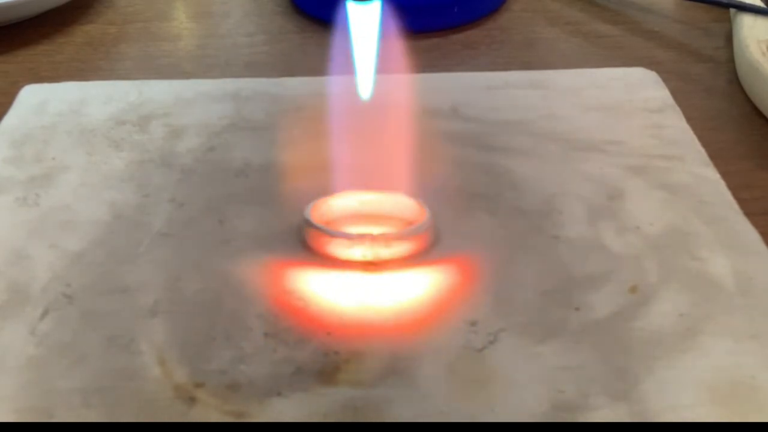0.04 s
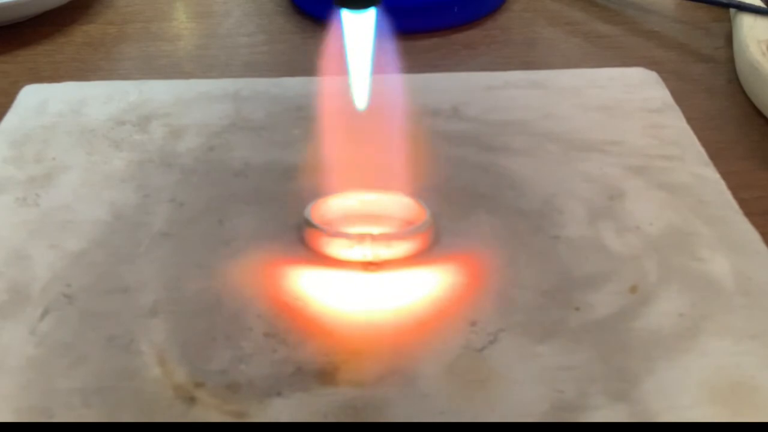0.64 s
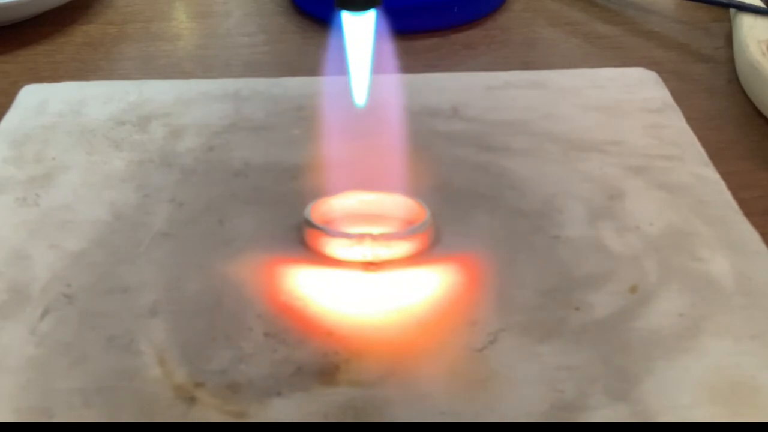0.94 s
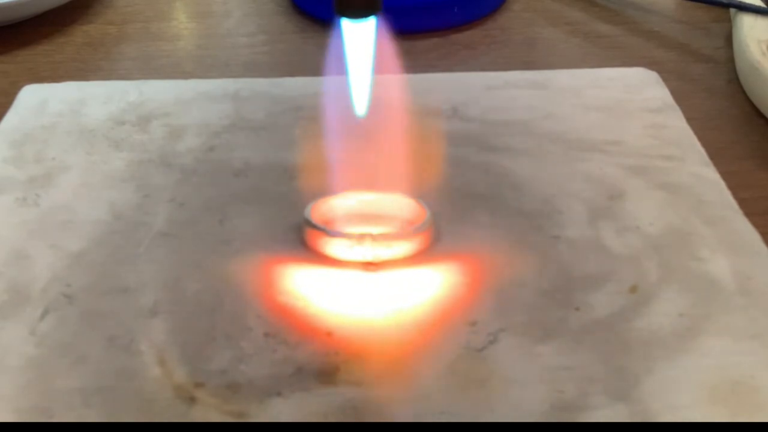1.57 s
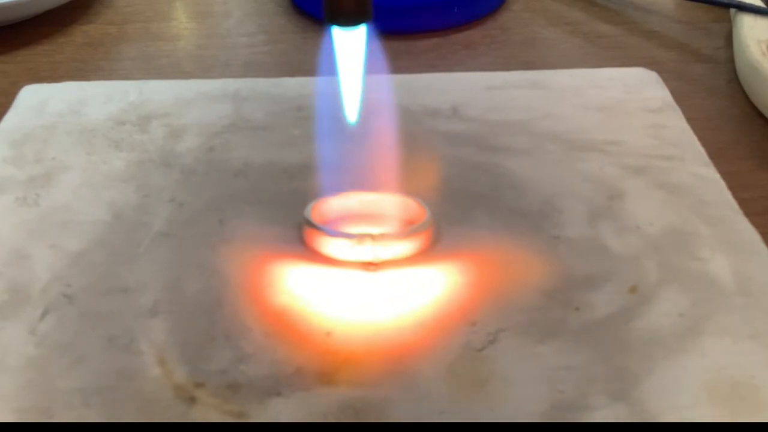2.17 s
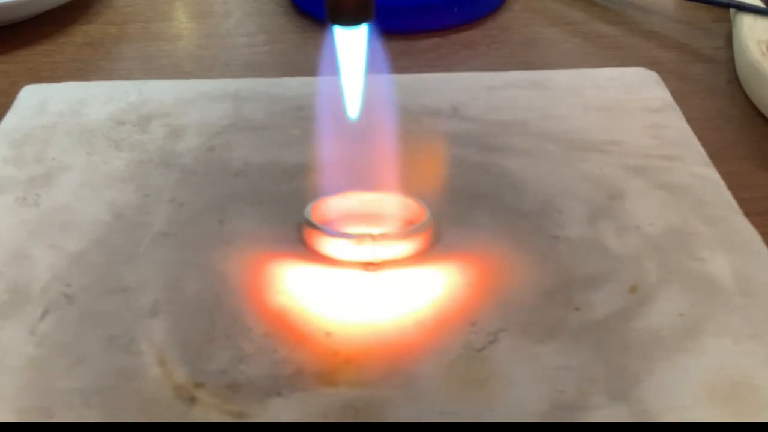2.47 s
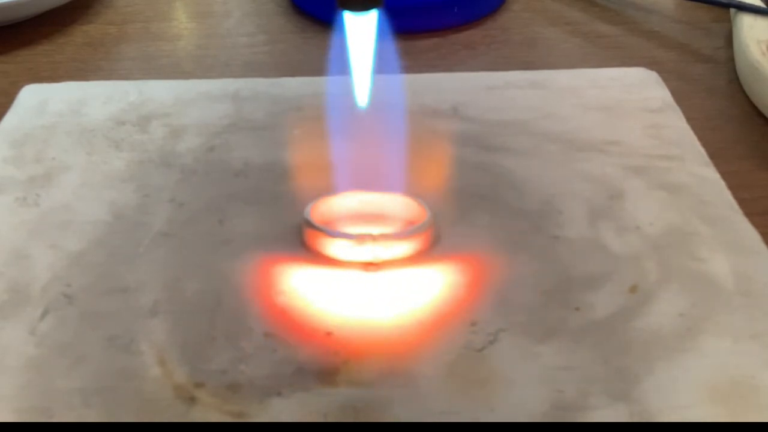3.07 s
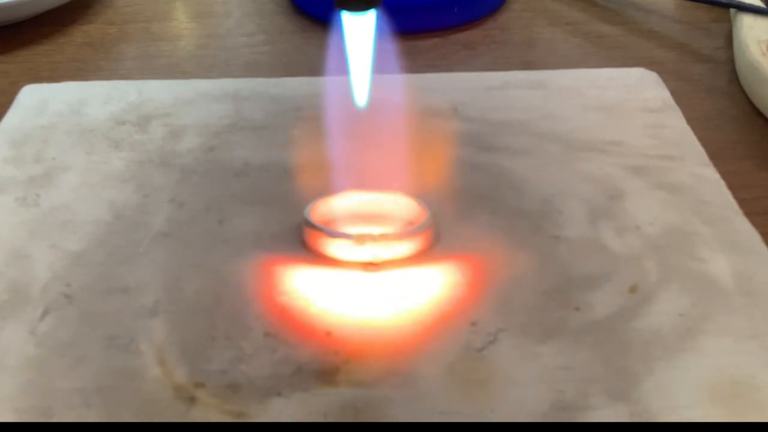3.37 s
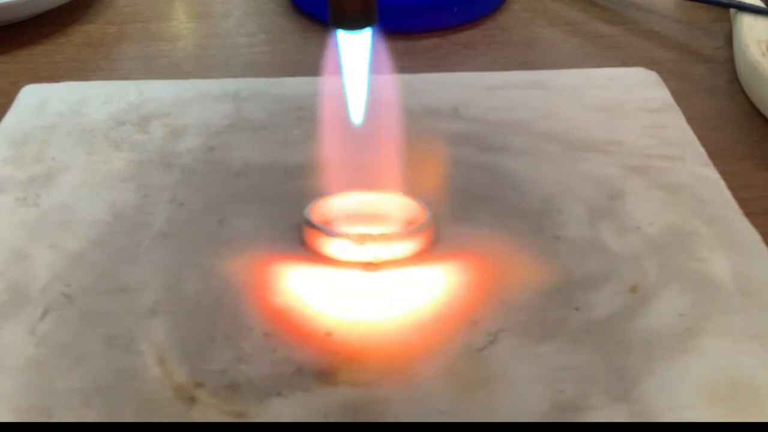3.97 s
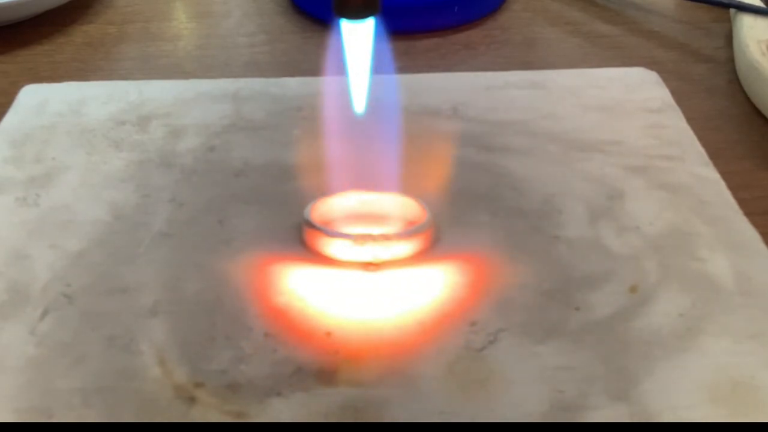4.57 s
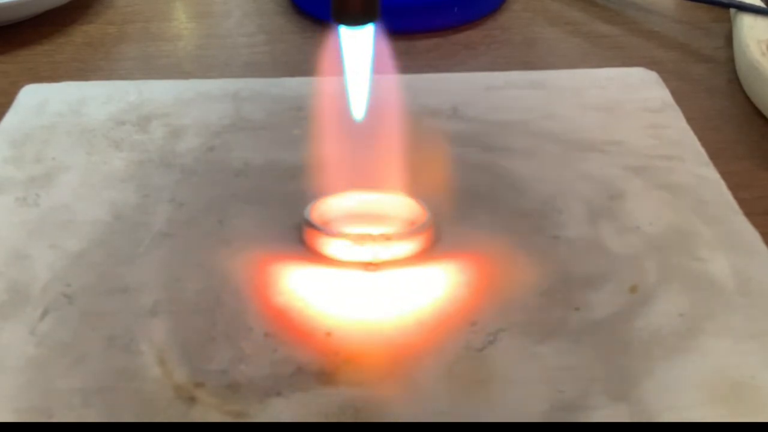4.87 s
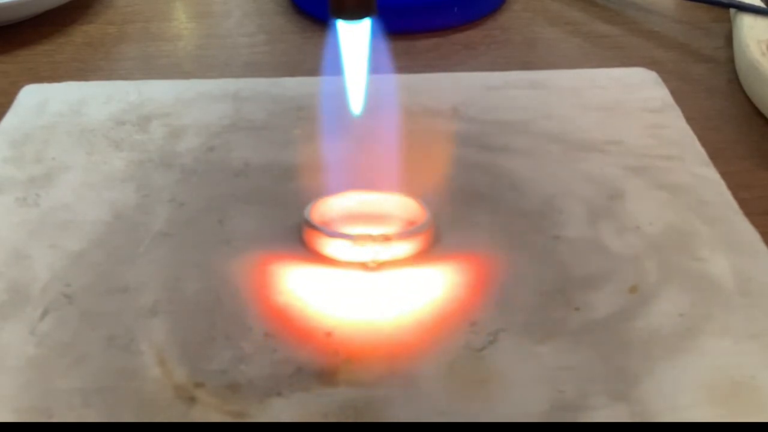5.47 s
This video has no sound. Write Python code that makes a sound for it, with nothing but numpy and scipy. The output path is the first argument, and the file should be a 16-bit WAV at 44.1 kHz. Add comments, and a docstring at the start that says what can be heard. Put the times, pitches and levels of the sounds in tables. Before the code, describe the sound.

From start to finish, a torch flame aimed at a ring gives a steady, ragged roar. Tiny puffs flare in quick succession, and brief, light snaps come now and then, while the nozzle hisses softly above. The flame is near the stereo microphone and slightly to the right. The small workshop sounds dry, with a quiet hum and a low rumble underneath.

```python
"""A turbulent flame roars in rapid little puffs and now and then snaps: a gas torch heating a ring on a
soldering block, close to a stereo microphone in a small workshop. Eddies make the flame flutter and
pockets of gas flare up in it, while the gas jet hisses and sets the burner tube ringing.
Behind the torch lie a soft low rumble, the hum of the room and a short, dull tail off the walls."""
import sys
import numpy as np
from scipy import signal
from scipy.fft import rfft, irfft, next_fast_len
from scipy.io import wavfile
from scipy.ndimage import uniform_filter1d

SR = 44100
rng = np.random.default_rng(int(sys.argv[2]) if len(sys.argv) > 2 else 0)


def inscribe(sig):
    """Save sig as 16-bit PCM at rate SR to the path in sys.argv[1].

    A 1-D sig is mono; a 2-D sig holds one channel per row.
    Samples are clipped to [-1, 1] before scaling.
    """
    pcm = np.round(np.clip(np.atleast_2d(sig).T, -1, 1) * 32767)
    wavfile.write(sys.argv[1], SR, pcm.astype(np.int16))


N = 248031
TIME = np.arange(N) / SR
FREQS = np.fft.rfftfreq(next_fast_len(N + SR // 2), 1 / SR)
FFT_SIZE = 2 * (len(FREQS) - 1)


# The colour of the roar. Each row: frequency in Hz, relative level in dB.
ROAR_SPECTRUM = [(20, -42), (60, -22), (200, -10), (500, -5), (780, 0.04), (1020, -0.34), (1420, -8),
                 (2020, -10.5), (2500, -23), (3900, -25.5), (6000, -33), (16000, -51)]
# The strongest puffs. Each row: time of the peak in seconds, half-length in seconds, relative peak in dB.
FLAME_PUFFS = [(0.043, 0.0028, -35), (0.249, 0.008, -36), (0.316, 0.0065, -36.5), (0.35, 0.0094, -36),
               (0.387, 0.0033, -47), (0.404, 0.0037, -37), (0.431, 0.0034, -34.5), (0.442, 0.011, -35.5),
               (0.494, 0.0059, -35), (0.541, 0.0059, -34.0), (0.578, 0.0052, -36.5), (0.641, 0.0036, -38),
               (0.676, 0.0042, -37), (0.714, 0.0042, -40), (0.746, 0.0037, -36.0), (0.805, 0.0045, -35),
               (0.827, 0.0035, -33.5), (0.845, 0.0088, -36.5), (0.912, 0.0057, -35), (1.007, 0.0091, -39),
               (1.042, 0.0062, -35), (1.059, 0.0034, -37.0), (1.095, 0.0053, -38.0), (1.352, 0.007, -39.0),
               (1.458, 0.0033, -33.5), (1.517, 0.0057, -38.5), (1.547, 0.0067, -38.5),
               (1.675, 0.0065, -37.5), (1.707, 0.005, -36), (1.757, 0.0033, -36.5), (1.842, 0.0033, -39),
               (1.858, 0.0057, -36), (1.974, 0.0082, -40), (2.021, 0.0031, -38), (2.046, 0.0038, -36.5),
               (2.222, 0.0037, -41), (2.24, 0.0038, -38), (2.312, 0.0066, -39), (2.325, 0.0112, -35.5),
               (2.437, 0.0034, -42), (2.53, 0.0035, -33), (2.561, 0.018, -39), (2.65, 0.0037, -35.5),
               (2.663, 0.0047, -37), (2.726, 0.0041, -36.5), (2.739, 0.0027, -33.5), (2.765, 0.012, -40),
               (2.888, 0.0073, -39), (2.942, 0.0027, -31.5), (3.011, 0.0024, -33.5), (3.09, 0.0024, -35.5),
               (3.108, 0.0087, -38), (3.124, 0.0025, -33.5), (3.177, 0.0049, -36.5), (3.309, 0.0025, -33.5),
               (3.392, 0.0075, -36), (3.528, 0.0032, -37), (3.547, 0.0044, -32.5), (3.574, 0.006, -35.5),
               (3.596, 0.0074, -37.5), (3.678, 0.002, -41), (3.691, 0.0026, -36.0), (3.711, 0.003, -41),
               (3.868, 0.0037, -38), (3.877, 0.0023, -39), (3.919, 0.014, -39), (3.992, 0.0108, -37.5),
               (4.032, 0.0079, -37.5), (4.057, 0.004, -32.5), (4.072, 0.0043, -36.5), (4.077, 0.0076, -41),
               (4.103, 0.0029, -34), (4.145, 0.0051, -37.5), (4.257, 0.003, -33), (4.422, 0.015, -43),
               (4.727, 0.0066, -34), (4.796, 0.0047, -37), (4.912, 0.0028, -39), (4.976, 0.0116, -37.0),
               (5.028, 0.0055, -33.5), (5.133, 0.0048, -36), (5.323, 0.0038, -37), (5.349, 0.0045, -41),
               (5.469, 0.0034, -43), (5.493, 0.003, -35), (5.506, 0.0023, -36), (5.559, 0.0071, -34.5)]
# Brief sags of the roar. Each row: middle in seconds, half-length in seconds.
ROAR_LULLS = [(0.136, 0.032), (0.292, 0.02), (0.635, 0.0097), (1.316, 0.016), (1.925, 0.019),
              (2.135, 0.014), (3.287, 0.012), (3.64, 0.011), (4.519, 0.021), (5.115, 0.015)]

def flame(roar_db=-43.5, lull_db=-4.5, flare_db=-19.5, hush_db=-0.5, flutter_db=5.0, surge_db=1.5):
    """The wrinkled flame front flutters: eddies make the upper roar ragged, the low body stays smooth."""
    colour = from_db(at_hz(ROAR_SPECTRUM))
    upper_share = FREQS ** 2 / np.hypot(FREQS ** 2, 540 ** 2)   # crossover at 540 Hz
    # the flame is broad, so each microphone port also hears a share of its own
    own_share = from_db(-11) * lowpass(2300, order=8)
    upper = filtered(white() + filtered(white_pair(), own_share), colour * upper_share)
    body = filtered(white() + filtered(white_pair(), own_share), colour * np.sqrt(1 - upper_share ** 2))
    body /= np.std(upper)
    fine_eddies = from_db(flutter_db * eddies(rate_hz=180))
    churn = fine_eddies * from_db(surge_db * eddies(rate_hz=50))
    flutter = rms_one(np.tanh(churn / 3.0))   # ordinary eddies stay below the big puffs
    lulls = sum(hump(s, half_s) for s, half_s in ROAR_LULLS)
    # the roar sinks while a pocket of gas gathers, and the whole flame flares around its puff
    hushes = sum(hump(s - 0.01, half_s=0.0063) for s, _, _ in FLAME_PUFFS)
    flare_power = sum((from_db(db + flare_db) * hump(s, half_s=0.024)) ** 2 for s, _, db in FLAME_PUFFS)
    roar = np.sqrt(from_db(roar_db + lull_db * lulls) ** 2 + flare_power) * from_db(hush_db * hushes)
    rasp = 1.6 * np.tanh(np.sqrt(fine_eddies) / 1.6)   # the same eddies, with their peaks rounded
    puffs = rasp * sum(from_db(db) * puff(s, half_s) for s, half_s, db in FLAME_PUFFS)
    return np.hypot(roar * flutter, puffs) * levelled(upper, samples=130) + roar * body


def puff(s, half_s, rise_share=0.71):
    """A pocket of gas flares up faster than it burns out."""
    return np.where(TIME < s, hump(s, half_s * rise_share), hump(s, half_s))


# The colour of a snap. Each row: frequency in Hz, relative level in dB.
SNAP_SPECTRUM = [(200, -25), (600, -7), (1300, 0), (2100, -2), (3000, -10.5), (3900, -9), (4700, -14),
                 (6000, -18), (8400, -8.5), (10000, -11), (12000, -14.5), (16000, -17)]
# The sharpest snaps. Each row: start in seconds, relative peak in dB, treble against that peak in dB.
FLAME_SNAPS = [(0.171, -30, -10), (0.2868, -31.5, -12), (0.3544, -36, -7), (0.4272, -25, -12),
               (0.6735, -32, -7), (0.8668, -38, 3), (1.0052, -30, -9), (1.058, -35.5, -3), (1.216, -39, -9),
               (1.2594, -34, -6), (1.63, -35, -3), (1.7084, -38, -5), (1.7494, -33.5, -9),
               (1.827, -31.5, -2), (1.9694, -37, -8), (2.2184, -31, -12), (2.307, -29, -14),
               (2.356, -30, -15), (2.487, -32, -4), (2.5284, -34, -9), (2.7502, -32.5, -2),
               (2.9792, -29.5, -12), (3.0246, -28.5, -12), (3.0985, -31, -1.5), (3.3202, -29.5, -2.5),
               (3.3436, -29, -7), (3.5468, -30, -9), (3.5715, -30, -15), (3.5917, -39, -6),
               (3.6896, -37, 1), (3.9112, -31, -9), (4.0146, -31, -9), (4.0698, -32.5, -1.5),
               (4.1006, -35.5, -5), (4.263, -32, -1), (4.2853, -30.5, -5), (4.7766, -31, -7),
               (4.907, -30.5, -9), (4.979, -33, -10), (5.0344, -34, -7), (5.3875, -29.5, -3),
               (5.4554, -36, -5), (5.5589, -44, -1)]

def snaps(treble_hz=6000, small_treble_db=-8):
    """Now and then a pocket of gas goes off abruptly; only the sharpest cracks carry much treble."""
    crack = levelled(filtered(white(), from_db(at_hz(SNAP_SPECTRUM))), samples=60)
    treble = filtered(crack, 1 - lowpass(treble_hz, order=6))
    small_snaps = [(s, db, small_treble_db) for s, db in scattered(per_s=6.5, mean_db=-45, spread_db=5)]
    starts, peak_db, treble_db = np.transpose([*FLAME_SNAPS, *small_snaps])
    return swells(starts, peak_db) * (crack - treble) + swells(starts, peak_db + treble_db) * treble


def swells(starts, peaks_db, rise_s=0.0012, fall_s=0.0018):
    """Pockets of gas burn off: each gives a brief swell of pressure."""
    envelope = np.zeros(N)
    for s, db in zip(starts, peaks_db):
        span = slice(*np.searchsorted(TIME, [s, s + rise_s + 10 * fall_s]))
        age = TIME[span] - s
        envelope[span] += from_db(db) * np.minimum((age / rise_s) ** 2, np.exp((rise_s - age) / fall_s))
    return envelope


# Peaks and notches from the surfaces under the flame. Each row: frequency in Hz, gain in dB.
BENCH_RIPPLE = [(700, 0.5), (780, 2.5), (940, -0.4), (1030, 2), (1170, -2), (1400, 5), (1600, 1.5),
                (1800, -1), (2020, 3), (2240, -5), (2430, 3.5), (2580, 4.5), (2760, -29), (3100, 10),
                (3450, -11), (3800, 4), (4050, -11), (4650, 1), (4950, -10), (5300, 0)]

def off_bench(fire):
    """Reflections off the block and the bench ripple the flame's colour."""
    return filtered(fire, from_db(at_hz(BENCH_RIPPLE)))


# The flame at the two microphone ports. Each row: frequency in Hz, left over right in dB.
PORT_BALANCE = [(100, -10), (300, 0), (450, -3), (560, 1), (750, -8.5), (880, 2), (980, -12), (1100, -1),
                (1400, -9), (1600, 0.5), (1770, -0.5), (2200, -1), (2600, -0.5), (8000, 0), (9300, 26),
                (12000, -1)]

def at_microphone(fire, left_lag_s=0.00018):
    """The flame is nearer the right port, so it reaches the left one later."""
    return filtered(fire, stereo(at_hz(PORT_BALANCE), -2 * np.pi * FREQS * left_lag_s))


# The broad hiss of the nozzle. Each row: frequency in Hz, noise density in dB.
HISS_SPECTRUM = [(2600, -127), (3400, -113), (4500, -106), (5000, -110), (7700, -105), (8600, -95.5),
                 (10500, -102), (12000, -103.5), (13200, -101.5), (14400, -101), (15200, -105),
                 (15700, -106)]
# The stereo spread of the high hiss. Each row: frequency in Hz, phase of left against right in radians.
HISS_SPREAD = [(6000, -0.5), (9500, -1.6), (11200, -5), (13000, -11), (13500, 8), (15200, -15)]
# The burner tube's resonances. Each row: frequency in Hz, width in Hz, peak noise density in dB,
# left over right in dB, phase of left against right in radians.
TUBE_MODES = [(3076, 210, -88, -7, 0.14), (3250, 160, -92, 7, -1), (4148, 170, -83, -1.5, -2),
              (5178, 175, -86, -0.5, 0), (5430, 400, -93.5, 8, -2.5), (5780, 370, -99, -2, 1),
              (6193, 91, -87.5, -24, -2.5), (6300, 520, -93, 6.5, -2.5), (7530, 210, -95, -1, -1.5),
              (7300, 190, -96.5, -1, 2), (8040, 320, -84.5, 0, 3.5), (8900, 340, -93, -1, -4.5),
              (8590, 360, -87, 6, -0.6), (9230, 610, -83, 10, -1.5), (10410, 580, -90.5, 3, -1),
              (11420, 620, -92, 0, -1), (12300, 260, -101, -6, -19), (13550, 480, -98, 0, 0.8)]
# The wavering gas flow. Each row: time in seconds, hiss in dB (only its swing about the mean is used).
GAS_FLOW = [(0, -54.5), (.39, -56.5), (.43, -57), (.49, -54.5), (.6, -55), (.7, -55), (.8, -53.5),
            (.87, -52.2), (.92, -55.5), (1.05, -55), (1.1, -54.5), (1.27, -54.5), (1.35, -52.5),
            (1.44, -54.5), (1.56, -55.5), (1.63, -53), (1.7, -56.5), (1.78, -54), (1.88, -55.4),
            (1.95, -53), (2.1, -58), (2.25, -54), (2.5, -55), (2.62, -56.5), (2.81, -56.5), (2.87, -55),
            (2.95, -55), (3.01, -55), (3.18, -57), (3.25, -54), (3.33, -55), (3.4, -55.5), (3.6, -54.5),
            (3.65, -55), (3.71, -55), (3.9, -54.5), (4.2, -54), (4.29, -52.5), (4.4, -55), (4.52, -55.8),
            (4.62, -52.5), (4.67, -55), (4.72, -55.5), (4.8, -53), (4.92, -55), (5.08, -55), (5.47, -55.5),
            (5.56, -50.5), (5.62, -56)]

def gas_jet(gain_db=0.16, low_hz=7500, air_hz=10100):
    """Gas hisses from the nozzle and rings the burner tube; more flow mostly lifts the middle band."""
    nozzle_response = from_db(at_hz(HISS_SPECTRUM)) * stereo(0, at_hz(HISS_SPREAD))
    nozzle = filtered(white() + from_db(-6) * white_pair(), nozzle_response)
    hiss = nozzle + resonances(TUBE_MODES)
    low = filtered(hiss, lowpass(low_hz, order=16))
    air = filtered(hiss, 1 - lowpass(air_hz, order=24))
    middle = hiss - low - air
    flow_db = np.interp(TIME, *np.transpose(GAS_FLOW))
    flow_db -= np.mean(flow_db)
    low_db = 0.57 * flow_db + 0.97 * eddies(rate_hz=120)   # the low modes stay rough
    middle_db = flow_db + 0.8 * eddies(rate_hz=30)
    air_db = 0.34 * flow_db + eddies(rate_hz=14)   # the airy top sizzles mostly on its own
    return from_db(gain_db) * (low * from_db(low_db) + middle * from_db(middle_db) + air * from_db(air_db))


# The low noise under the torch. Each row: frequency in Hz, relative level in dB.
RUMBLE_SPECTRUM = [(20, -47), (35, -34), (48, -9.5), (57, -4.5), (71, -1), (87, -7), (105, -8.5),
                   (160, -21), (400, -64)]
# A drone that swells twice, perhaps a far engine. Each row: time of the peak in seconds,
# half-length in seconds, pitch at the peak in Hz, glide in Hz per second, relative level in dB.
DRONE_SWELLS = [(2.447, 0.35, 70.2, 13.5, -52), (3.761, 0.19, 70.6, -14.5, -52.5)]

def rumble(bed_db=-57, drone_gain_db=-2, balance_db=3.5):
    """Soft low noise and a gliding drone, nearly alike at both ports but a little louder on the left."""
    noise = white() + from_db(-11) * white_pair()
    bed = from_db(bed_db) * rms_one(filtered(noise, from_db(at_hz(RUMBLE_SPECTRUM))))
    drone = 0
    for s, half_s, hz, glide, db in DRONE_SWELLS:
        phase = 2 * np.pi * np.cumsum(hz + glide * (TIME - s)) / SR
        drone += from_db(db + drone_gain_db) * hump(s, half_s) * np.sqrt(2) * np.sin(phase)
    return (bed + drone) * from_db([[balance_db / 2], [-balance_db / 2]])


# The hum of the workshop. Each row: frequency in Hz, width in Hz, peak noise density in dB,
# left over right in dB, phase of left against right in radians.
HUM_BANDS = [(124, 30, -73, 0, -0.36), (184.2, 15, -74, 1.5, -0.5), (266.7, 13, -74, 0.5, -0.23),
             (361.6, 11.5, -70.5, -3, -1.75), (545, 19, -72.5, 7, -0.61)]

def room_hum():
    """The room hums around the microphone in a few narrow, low bands of noise."""
    return resonances(HUM_BANDS)


def workshop_tail(fire, gain_db=-16, t60_s=0.09, first_echo_s=0.00319, wall_cut_hz=5500):
    """Bench and walls return a short, dull tail, different at each port."""
    decay = from_db(-60 * np.minimum(TIME / t60_s, 2)) * (TIME > first_echo_s)
    tail = rng.standard_normal((2, N)) * decay
    tail /= np.sqrt(np.sum(tail ** 2) / 2)
    return from_db(gain_db) * filtered(fire, rfft(tail, FFT_SIZE) / (1 + 1j * FREQS / wall_cut_hz))


def resonances(modes):
    """Noise drives each mode on its own, and each has its own place between left and right."""
    spectrum = 0
    for hz, width_hz, db, balance_db, phase in modes:
        peak = from_db(db) / (1 + (2 * (FREQS - hz) / width_hz) ** 2)
        spectrum += rfft(white(), FFT_SIZE) * peak * stereo(balance_db, phase)
    return irfft(spectrum, FFT_SIZE)[:, :N]


def stereo(balance_db, phase):
    """Left and right responses for a difference in level and phase, at constant power."""
    right = np.ones(len(FREQS))
    left = from_db(balance_db) * np.exp(1j * phase) * right
    return np.array([left, right]) * np.sqrt(2 / (1 + abs(left) ** 2))


def eddies(rate_hz):
    """Smooth random swings of spread 1, changing up to about the given rate, without slow drift."""
    band = FREQS / np.hypot(FREQS, rate_hz / 6) * lowpass(rate_hz, order=2)
    return rms_one(filtered(white(), band))


def scattered(per_s, mean_db, spread_db):
    """Events at random moments. Each row: start in seconds, level in dB."""
    gap_draws, level_draws = rng.random((200, 2)).T
    starts = np.cumsum(-np.log(1 - gap_draws)) / per_s
    levels_db = mean_db + spread_db * (2 * level_draws - 1)
    return np.column_stack([starts, levels_db])[starts < N / SR]


def hump(s, half_s):
    """A smooth rise and fall of height 1 around a moment."""
    return np.exp(-np.minimum(((TIME - s) / half_s) ** 2, 20))


def levelled(x, samples):
    """The same swings at an even strength of 1."""
    power = np.mean(np.atleast_2d(x) ** 2, axis=0)
    return x / np.sqrt(uniform_filter1d(uniform_filter1d(power, samples), samples) + 1e-20)


def white():
    """Noise of 0 dB per Hz."""
    return rng.standard_normal(N) * np.sqrt(SR / 2)


def white_pair():
    """Separate noise for left and right."""
    return np.array([white(), white()])


def at_hz(points):
    """A short table joined by straight lines over log frequency."""
    hz, value = np.transpose(points)
    return np.interp(np.log(FREQS + 1), np.log(hz), value)


def lowpass(hz, order):
    return 1 / (1 + (FREQS / hz) ** order)


def filtered(x, response):
    return irfft(rfft(x, FFT_SIZE) * response, FFT_SIZE)[..., :N]


def from_db(db):
    return 10 ** (np.asarray(db) / 20)


def rms_one(x):
    return x / np.sqrt(np.mean(x ** 2) + 1e-20)


def scene():
    """Flame and jet close to the microphone, over the rumble and hum of the workshop."""
    fire = off_bench(flame() + snaps())
    return at_microphone(fire) + workshop_tail(fire) + gas_jet() + rumble() + room_hum()


def record(dry):
    """The top is cut steeply above 15.7 kHz."""
    return signal.sosfilt(signal.ellip(10, .1, 80, 15700, fs=SR, output="sos"), dry)


dry = scene()
out = record(dry)
inscribe(out)
```